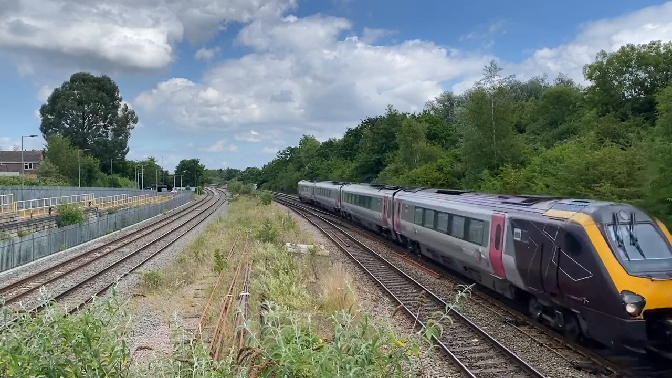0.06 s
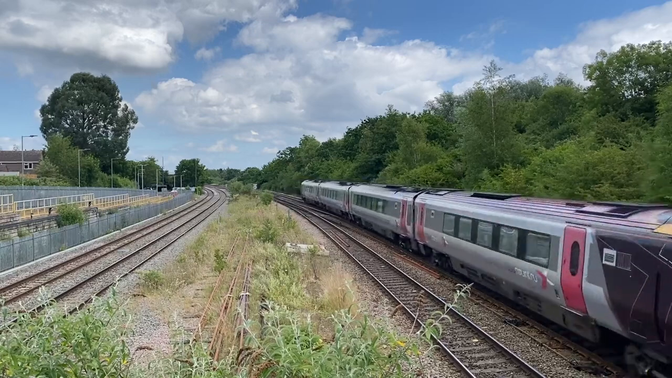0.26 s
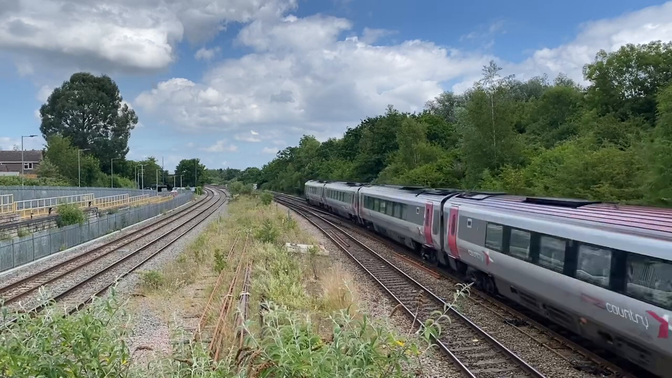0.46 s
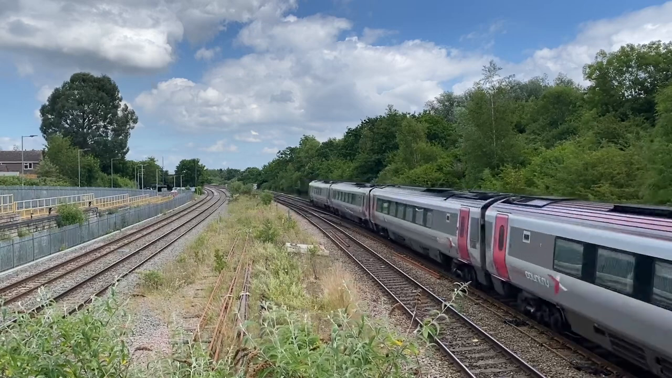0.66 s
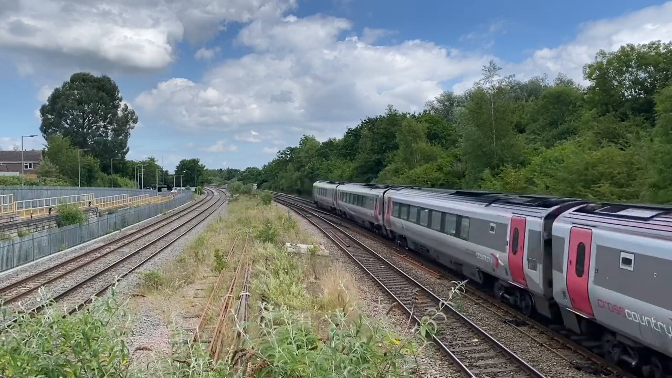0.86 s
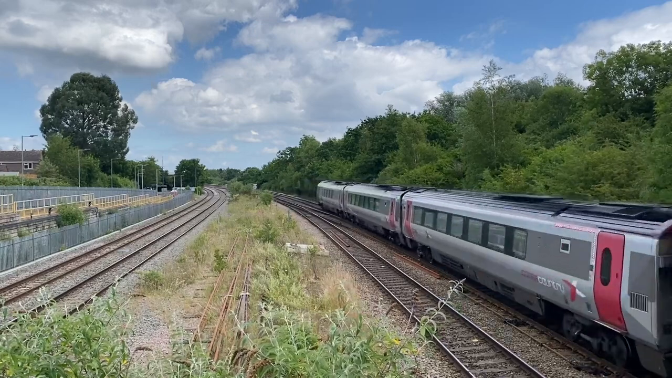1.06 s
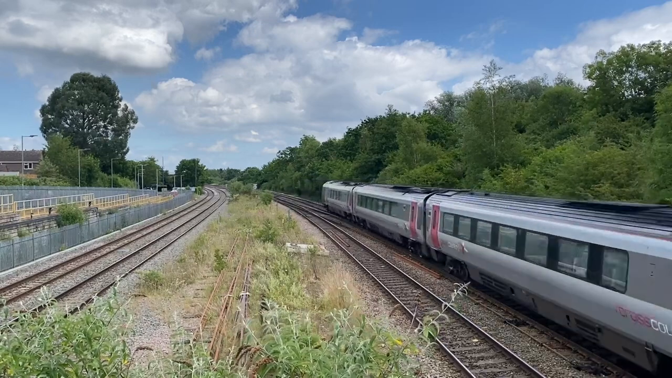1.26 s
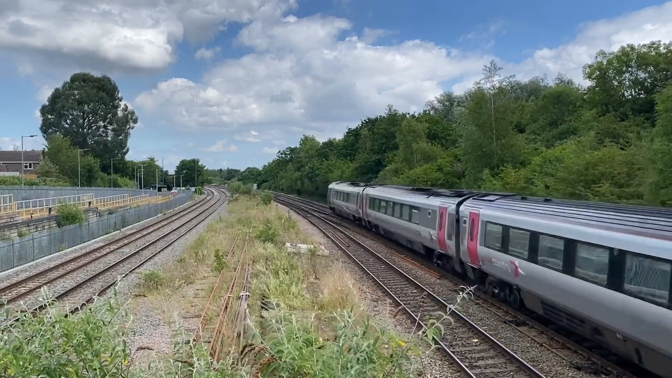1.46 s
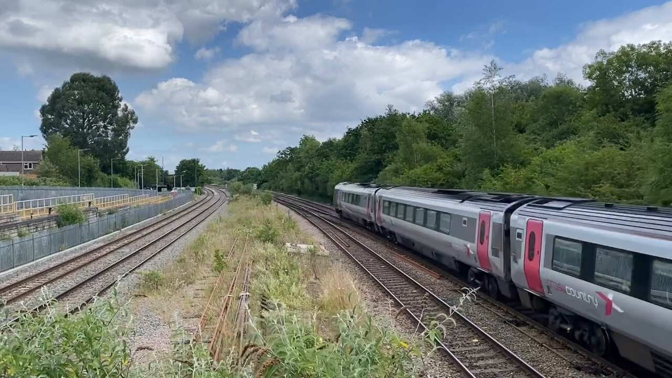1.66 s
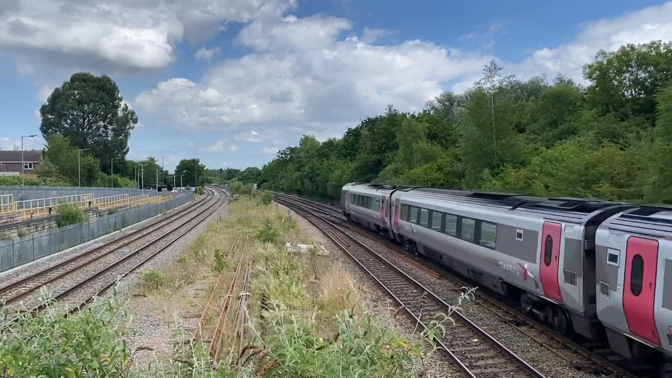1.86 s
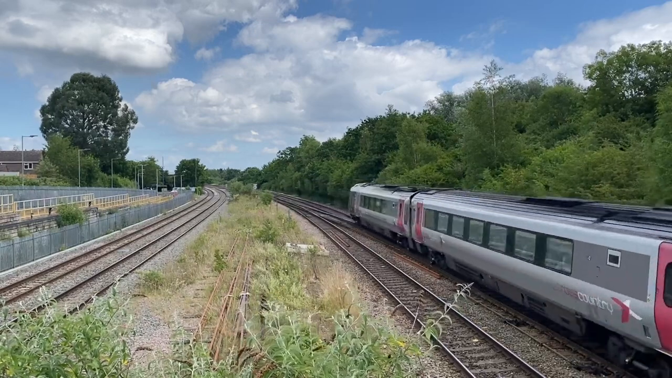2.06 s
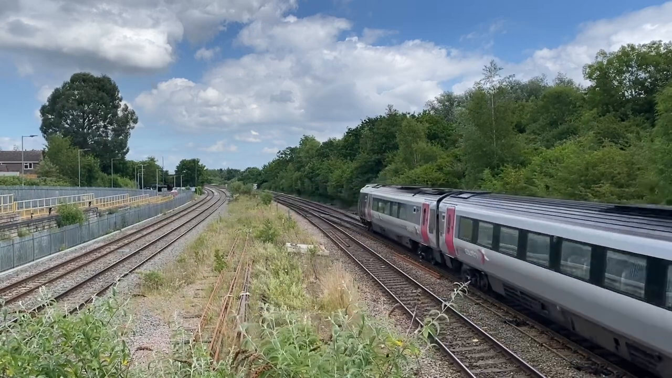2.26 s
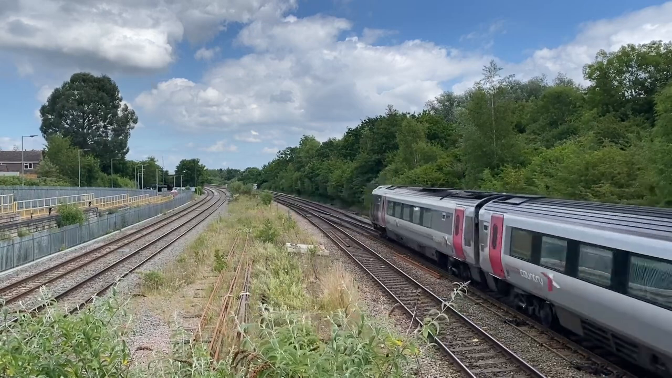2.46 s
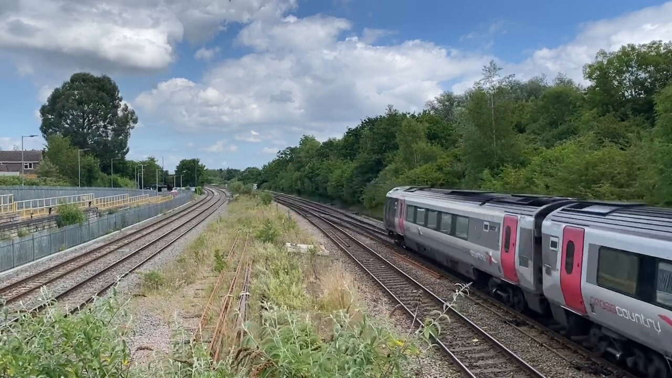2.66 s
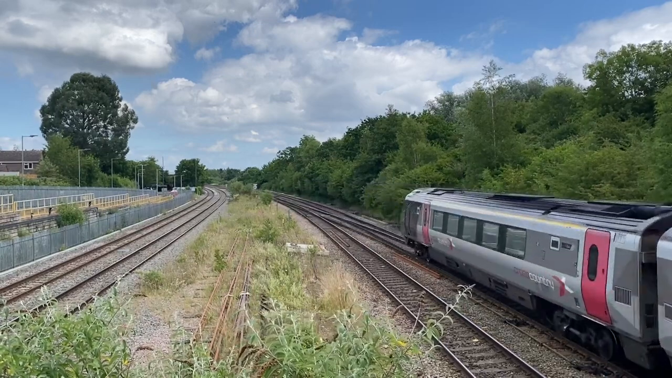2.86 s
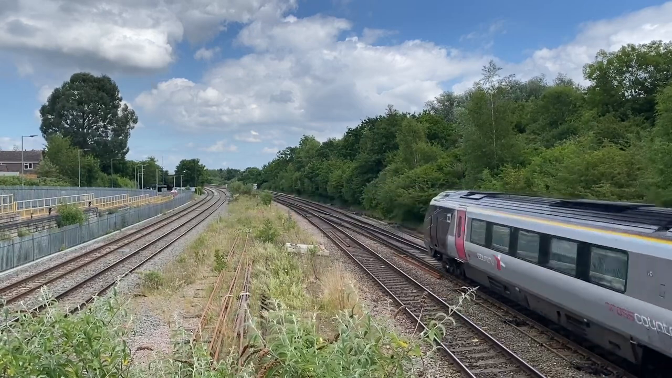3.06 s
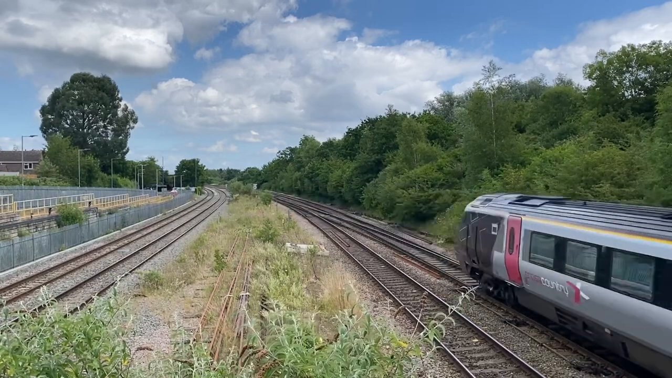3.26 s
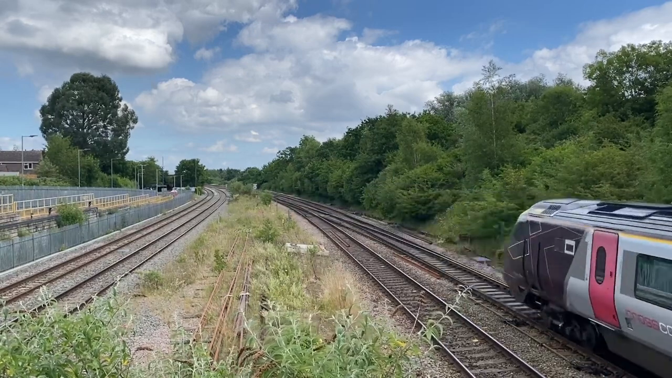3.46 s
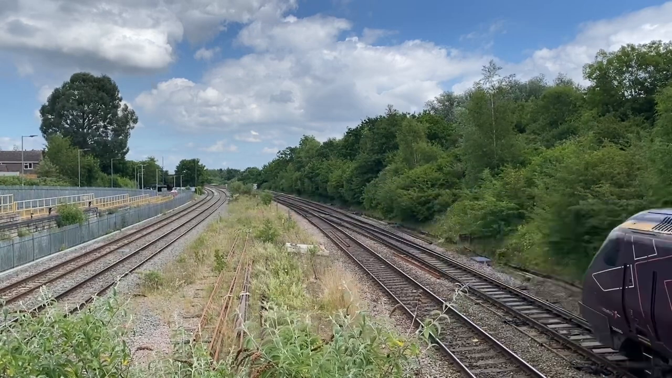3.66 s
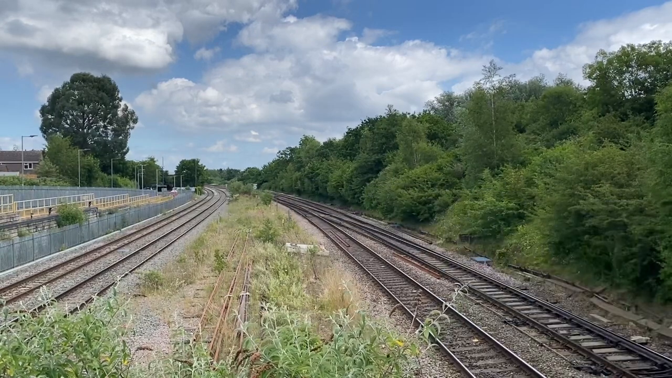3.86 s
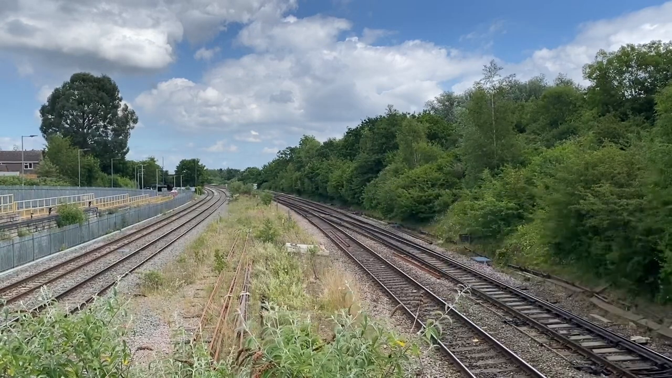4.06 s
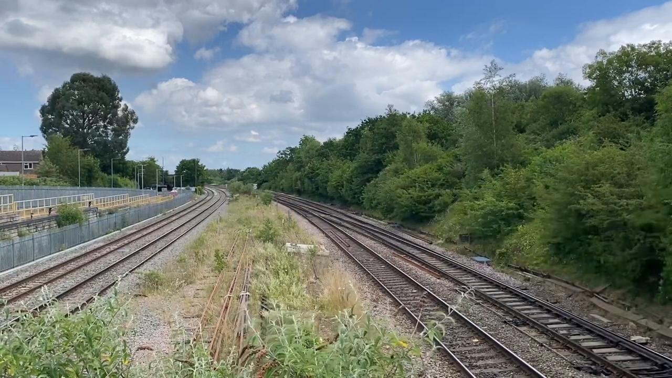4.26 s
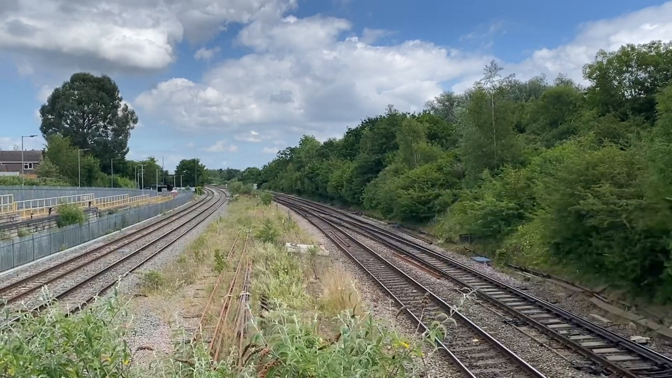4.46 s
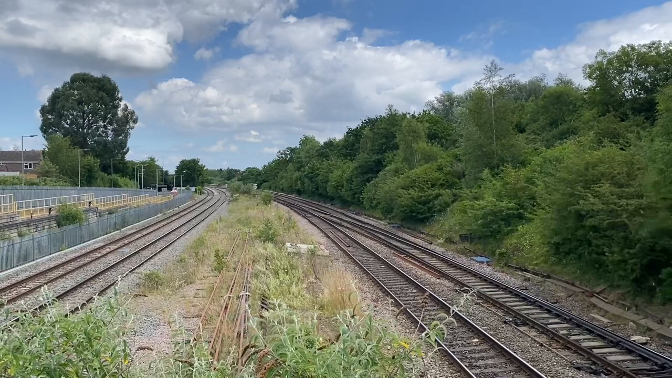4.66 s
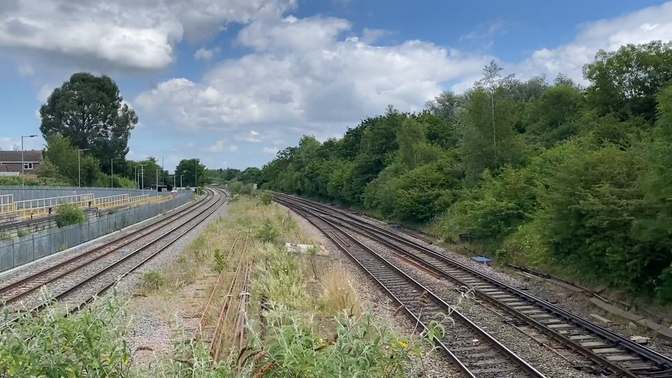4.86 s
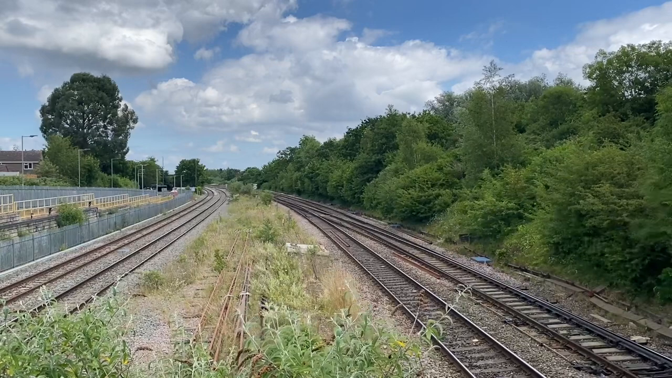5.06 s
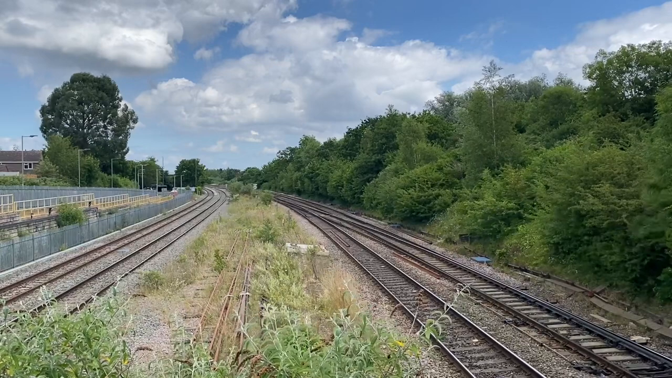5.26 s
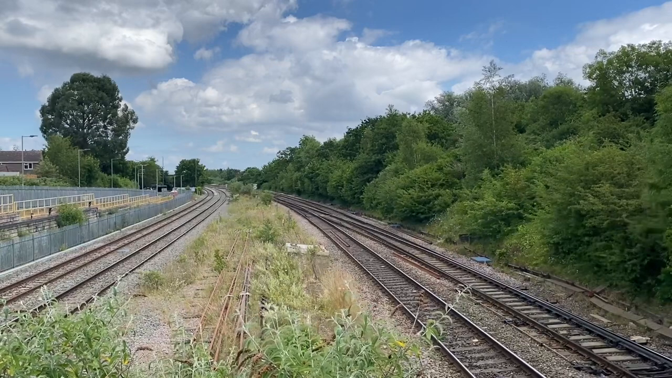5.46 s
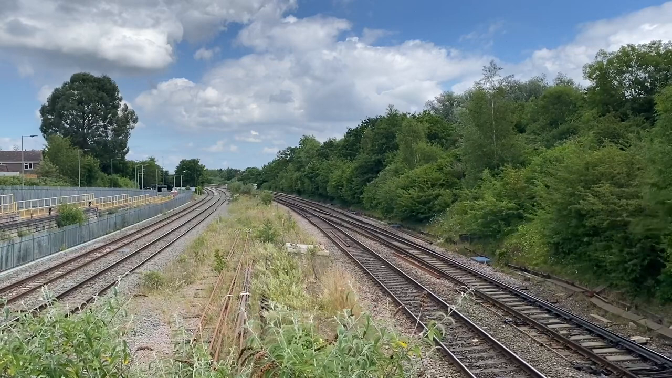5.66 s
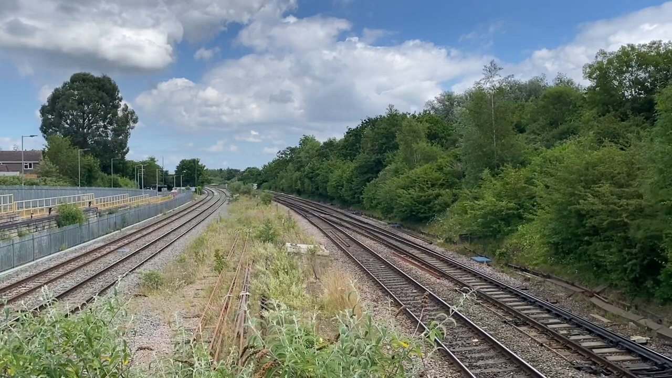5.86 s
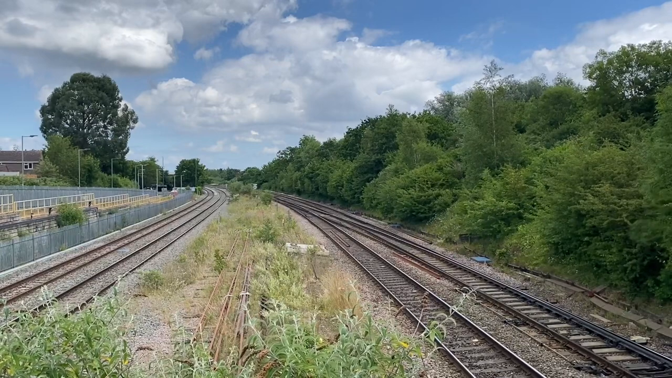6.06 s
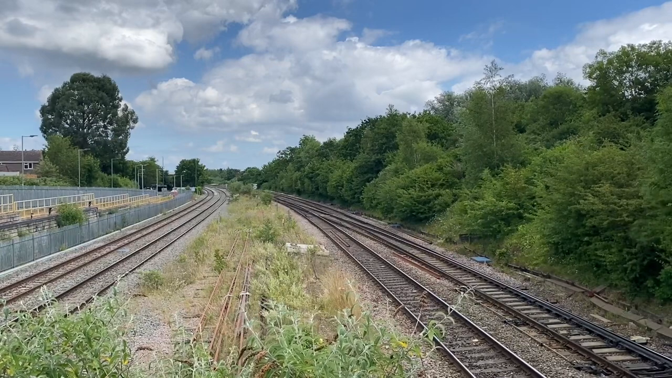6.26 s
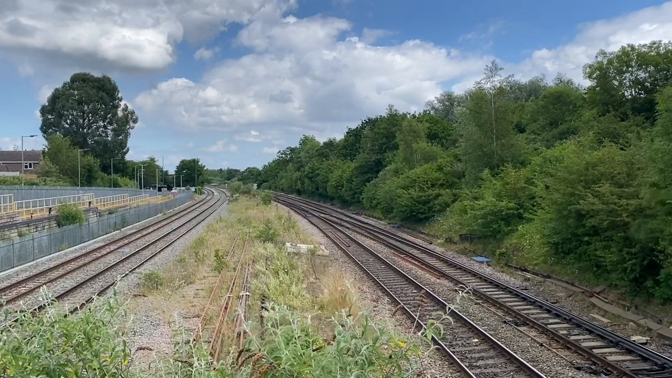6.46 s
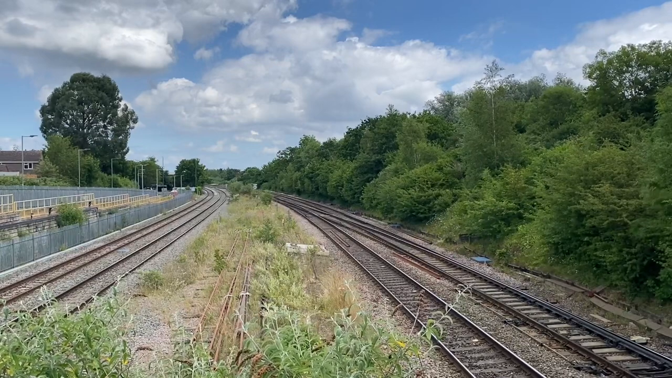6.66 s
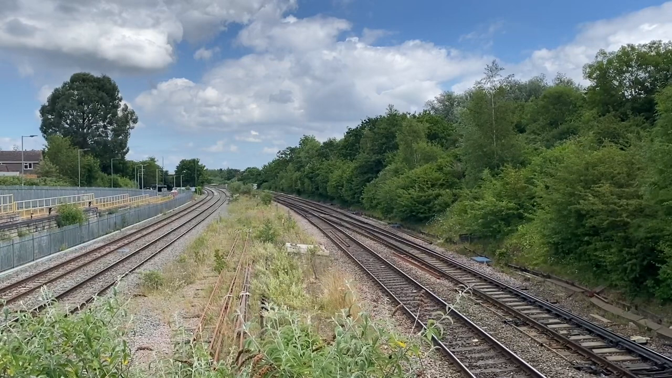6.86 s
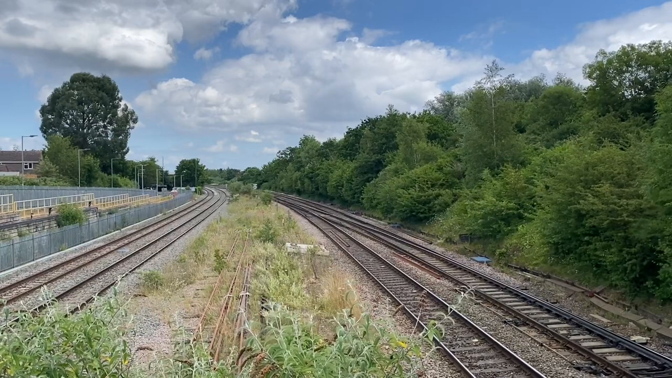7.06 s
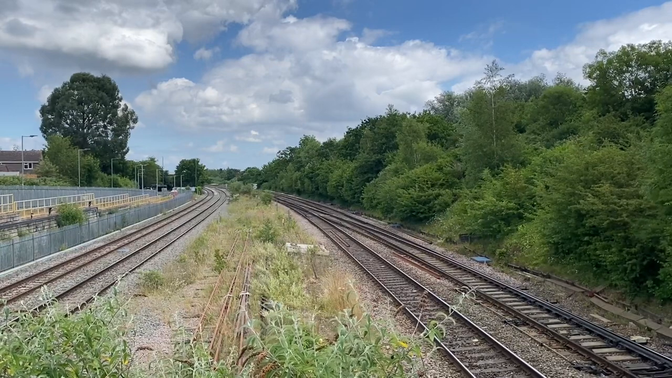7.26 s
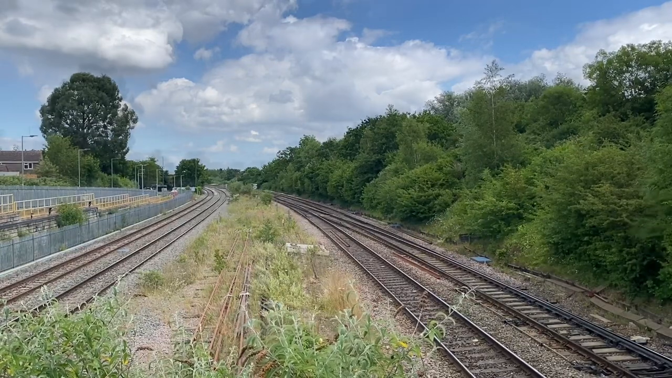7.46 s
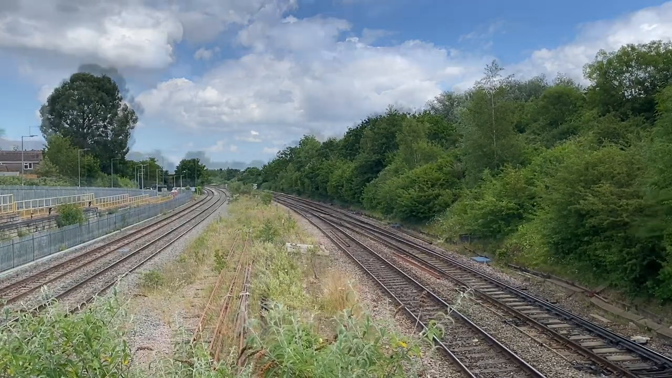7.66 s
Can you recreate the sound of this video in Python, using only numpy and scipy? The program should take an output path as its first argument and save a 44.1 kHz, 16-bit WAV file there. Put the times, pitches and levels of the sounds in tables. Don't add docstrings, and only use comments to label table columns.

```python
import sys
import numpy as np
from scipy import signal
from scipy.fft import rfft, irfft, next_fast_len
from scipy.io import wavfile
from scipy.ndimage import uniform_filter1d

SR = 44100
rng = np.random.default_rng(int(sys.argv[2]) if len(sys.argv) > 2 else 0)


def convert_level_to_amplitude(level_db):
    exponent = np.asarray(level_db, float) / 20
    return 10 ** exponent


def log_audio(samples):
    frames = np.atleast_2d(samples).T
    limited = np.clip(frames, -1, 1)
    pcm = np.round(limited * 32767).astype(np.int16)
    wavfile.write(sys.argv[1], SR, pcm)


N = 340211
T = np.arange(N) / SR
GONE = np.clip((T - 3.8) / (4.9 - 3.8), 0, 1)

# [t/s, level/dB]
WHEEL_ROAR = [(0.0, -30), (0.1, -25), (0.13, -24.5), (0.54, -24), (1.22, -21.5), (1.31, -24), (3.67, -26),
              (3.97, -30), (4.79, -31), (5.09, -34.5), (5.13, -31.5), (5.2, -33), (7.45, -38.5),
              (7.71, -44.5)]


def over_time(table):
    return np.interp(T, *np.transpose(table))


def at(table, hz):
    f, v = np.transpose(table)
    return np.interp(np.log(hz + 1), np.log(f + 1), v)


def band(x, hz, width):
    edges = np.clip([hz - width / 2, hz + width / 2], 5, SR * .49)
    return signal.sosfilt(signal.butter(2, edges, "band", fs=SR, output="sos"), x)


def hiss_band(hz, width):
    x = band(rng.standard_normal((2, N)), hz, width)
    return x / x.std()


def walk(rate):
    k = int(SR / rate)
    held = np.repeat(rng.standard_normal(N // k + 1), k)
    return 1.3 * uniform_filter1d(uniform_filter1d(held, k), k)[:N]


def random_phase():
    return 2 * np.pi * rng.random()


def burst(s, rise, fall):
    t = np.maximum(T - s, 0)
    return (1 - np.exp(-t / rise)) * np.exp(-t / fall)


def swell(s, length, db):
    return db * np.exp(-((T - s) / length) ** 2)


def whistle(s, length, hz, glide, width, db):
    carrier = np.cos(2 * np.pi * (hz + glide * (T - s) / 2) * (T - s))
    return swell(s, length, convert_level_to_amplitude(db)) * carrier * hiss_band(width / 4, width / 2)


def rush(lo, count, colour_db, levels, centres, shared_db, own_db, rate):
    out = 0
    shudder = [walk(rate) for _ in levels]
    for hz in lo * 2 ** (np.arange(count) / 3):
        share = [np.interp(np.log(hz), np.log(centres), row) for row in np.eye(len(centres))]
        db = sum(w * (c + shared_db * s) for w, c, s in zip(share, levels, shudder))
        gain = convert_level_to_amplitude(db + colour_db(hz) + own_db * walk(2 * rate))
        out = out + hiss_band(hz, hz * .23) * np.sqrt(hz / 1000) * gain
    return out


def engines(wobble=0.0021, rough_db=0.5, focus=2.0, growl_focus=1.34):
    # [t/s, firing rate f/Hz, level/dB, second order/dB, third order/dB]
    cars = [
        (.7, 92.7, -11, -8, -18),
        (1.649, 92.12, 5, -3, -6.5),
        (2.63, 91.73, 1, -1, 0.5),
        (3.499, 91.6, 1, 2.5, 3.5),
    ]
    # [multiple of firing rate, level/dB]
    growl_orders = [(2 / 3, -23.5), (4 / 3, -18), (2, -19.5), (5 / 3, -8), (2, -1.5), (7 / 3, -8.5),
                    (2.5, -15.5), (8 / 3, -13), (3, -7.5), (10 / 3, -17.5), (4.5, -25)]
    # [t/s, level/dB]
    loudness = [(0.0, -24), (0.23, -24.5), (0.32, -32.5), (1.16, -19.5), (1.24, -37), (1.31, -22),
                (1.76, -16.5), (1.8, -26), (1.87, -20), (2.86, -17.5), (2.9, -24), (3.35, -15),
                (4.66, -32.5), (4.87, -44), (5.15, -33.5), (6.76, -52), (6.81, -43), (7.71, -46)]
    speed_ms, track_m = 25., 7.975
    tone, growl, power = 0, 0, np.zeros((2, N))
    for s, hz, db, second_db, third_db in cars:
        along = speed_ms * (T - s)
        r = np.hypot(along, track_m)
        heard_hz = hz / (1 + speed_ms / 343 * along / r) * (1 + wobble * walk(6))
        phase = 2 * np.pi * np.cumsum(heard_hz) / SR
        near = convert_level_to_amplitude(db) * np.array([r ** -focus, r ** -growl_focus])
        tone = tone + near[0] * np.sin(phase + random_phase())
        for k, order_db in growl_orders:
            car_db = {2: second_db, 3: third_db}.get(k, 0.1) - 5 * GONE * (k > 2.6)
            gain = convert_level_to_amplitude(order_db + car_db + rough_db * walk(15))
            growl = growl + near[1] * gain * np.sin(k * phase + random_phase())
        power += near ** 2
    tone, growl = np.array([tone, growl]) * np.sqrt(2 / power)
    level_db = over_time(loudness)
    smooth_db = uniform_filter1d(level_db, int(0.63 * SR))
    exhaust_ahead_db = swell(s=.2, length=0.48, db=5.4)
    growl_db = -20.5 + 0.95 * (smooth_db + 20.5) + exhaust_ahead_db - 6 * GONE
    return tone * convert_level_to_amplitude(level_db + 0.5 - 7.2 * GONE ** 2) + growl * convert_level_to_amplitude(growl_db)


def rolling():
    # [f/Hz, level per Hz/dB]
    near_colour = [(15, -42), (25, -25), (71, -2.5), (152, -4.5), (209, -1.5), (300, -9), (404, -6),
                   (543, -10.5), (763, -7), (1270, -11.5), (1780, -18.5), (2910, -27.5), (4000, -36),
                   (5200, -61), (8800, -120)]
    far_colour = [(15, -42), (25, -24), (71, -7), (113, -10.5), (213, -4), (333, -14), (387, -3.5),
                  (521, -8), (644, -5.5), (1070, -5), (1380, -28.5), (1780, -16.5), (2850, -37.5),
                  (4000, -49), (5200, -66), (8800, -120)]
    # [f/Hz, width/Hz, level
    # under the roar/dB]
    narrow_tones = [(409, 5, -9.5), (456, 4, -8), (514, 4, -10), (1066, 12, -12), (1755, 40, -20)]
    roar_db = over_time(WHEEL_ROAR)
    near_mean_db = np.mean(roar_db[:SR])
    far_mean_db = np.mean(roar_db[int(5.7 * SR):int(7.4 * SR)])
    change = roar_db - near_mean_db * (1 - GONE) - far_mean_db * GONE
    ground, rumble, wheels, rail = (k * change for k in (1.75, 1.43, 0.84, 1.2))
    slipstream_db = swell(s=4.2, length=0.27, db=11)
    rail_sings_db = swell(s=4.04, length=0.47, db=6.1)
    levels = [ground + slipstream_db, rumble, wheels, rail + rail_sings_db]

    def colour_db(hz):
        return (at(near_colour, hz) - 16) * (1 - GONE) + (at(far_colour, hz) - 30) * GONE

    roar = rush(27.86, count=22, colour_db=colour_db, levels=levels, centres=(50, 250, 830, 1900),
                shared_db=1.3, own_db=1.4, rate=12)
    tones = sum(convert_level_to_amplitude(db + 2 * walk(4)) * hiss_band(hz, width) for hz, width, db in narrow_tones)
    return roar + tones * convert_level_to_amplitude(uniform_filter1d(roar_db, SR // 2)) * GONE


def air(far_loss_db=9):
    # [t/s, level/dB]
    hiss = [(0.0, -42.5), (0.19, -41), (0.54, -35), (0.86, -32), (2.19, -40), (2.45, -40), (3.63, -41),
            (4.12, -41.5), (4.27, -48), (4.55, -49), (4.83, -53), (5.93, -56), (7.39, -61), (7.71, -66)]
    # [f/Hz, level per Hz/dB]
    hiss_colour = [(2000, -2), (3000, 0), (4000, 3), (6000, 2.5), (8000, 0), (10000, 4.5), (12000, -8),
                   (14500, -7), (16000, -10)]
    # [t/s, length/s, rise/dB]
    puffs = [
        (0.104, 0.32, 6),
        (0.437, 0.14, 7),
        (1.393, .04, 4.5),
        (1.702, 0.029, 0),
        (2.253, 0.056, 2),
        (3.177, .08, 3),
        (3.86, .06, 3),
    ]

    def colour_db(hz):
        return at(hiss_colour, hz) - 12 - far_loss_db * GONE * (hz > 12500)

    brake_gear_db = swell(s=.76, length=.16, db=3.5)
    hiss_db = over_time(hiss) + brake_gear_db
    gear = convert_level_to_amplitude(hiss_db - 15.5 - 14.5 * GONE + sum(swell(*row) for row in puffs))
    leaves = convert_level_to_amplitude(-73.5 + 0.29 * (hiss_db + 55.5))
    top_db = 20 * np.log10(np.hypot(gear, leaves))
    port = hiss_band(14900, 1300) * gear * convert_level_to_amplitude(1 - far_loss_db * GONE + 1.7 * walk(12))
    return port + rush(2210, count=9, colour_db=colour_db, levels=[hiss_db, top_db + 13.0],
                       centres=(5400, 11100), shared_db=1.5 - .9 * GONE, own_db=1.33, rate=12)


def thuds():
    # [t/s, peak over the roar/dB]
    sleeper_blows = [(.031, 16), (.097, 15.5), (.315, 16.5), (.406, 11.5), (.855, 9), (1.045, 13),
                     (1.493, 12), (1.783, 7.5), (2.151, 10), (2.556, 14), (2.734, 8), (3.059, 11),
                     (3.239, 7), (3.773, 12), (4.118, 13), (5.606, 10), (6.169, 8), (6.399, 16),
                     (6.517, 14), (7.299, 1), (7.399, 13)]
    wheel_blows = [(.203, 16), (.717, 13.5), (1.154, 6.5), (1.215, 13), (1.638, 14), (1.875, 14.3),
                   (2.288, 8.6), (2.639, 16.5), (2.837, 8), (3.131, 15.4), (3.457, 18), (3.547, 10),
                   (4.031, 13), (4.202, 13), (4.543, 14.3), (4.759, 14.5), (5.127, 13), (5.942, 10),
                   (6.909, 17)]

    def blows(rows):
        return sum(convert_level_to_amplitude(db - .5) * burst(s, .006, .025) for s, db in rows)

    sleeper = blows(sleeper_blows) * hiss_band(474, 0.72 * 474)
    wheel = blows(wheel_blows) * hiss_band(780, 0.46 * 780)
    return convert_level_to_amplitude(over_time(WHEEL_ROAR)) * (sleeper + wheel)


def joint_clacks():
    # [t/s, first axle peak level/dB, second axle peak level/dB]
    bogies = [(.327, -19, -17), (.943, -32, -25), (1.426, -30, -24), (1.939, -23, -38), (2.183, -24, -25),
              (2.784, -24, -20), (3.073, -21, -21.5), (3.613, -24.5, -23), (3.8, -25.5, -41),
              (4.13, -26, -24), (4.547, -25, -25)]
    axle_gap_s = 0.092
    clack = hiss_band(4370, 4600) + convert_level_to_amplitude(-22) * hiss_band(7000, 13500)
    out = np.zeros((2, N))
    for s, first_db, second_db in bogies:
        first = convert_level_to_amplitude(first_db - 4) * burst(s, 0.0077, 0.024)
        second = convert_level_to_amplitude(second_db - 4.5) * burst(s + axle_gap_s, .01, 0.025)
        out += (first + second) * clack
    return out


def air_leaks():
    # [t/s, length/s, level/dB]
    leaks = [
        (.45, 0.12, -34),
        (1.38, .049, -38),
        (2.061, .071, -37.5),
        (2.35, 0.097, -41),
        (2.93, .066, -42),
        (3.245, 0.097, -45),
        (3.87, 0.11, -47),
    ]
    return sum(whistle(s, length, 10570, 0, 550, db) for s, length, db in leaks)


def flange_squeals():
    # [t/s, length/s, f/Hz, glide/(Hz/s), level/dB]
    squeals = [
        (.779, 0.13, 4770, -6000, -30),
        (2.09, 0.012, 1850, 2, -21),
        (4.177, 0.023, 2760, 9000, -28),
        (4.57, .034, 4820, -2, -36),
    ]
    flanges = sum(whistle(s, length, hz, glide, .27 * hz, db) for s, length, hz, glide, db in squeals)
    return flanges + whistle(s=0.56, length=0.8, hz=1816, glide=0.5, width=120, db=-29)


def far_drone(rough_db=2):
    # [multiple of firing rate, level/dB]
    far_orders = [(1, 0.5), (5 / 3, -2.5), (2, -0.5), (7 / 3, -2.5), (8 / 3, -4), (3, -4.5)]
    firing_hz = 86.0
    phase = 2 * np.pi * firing_hz * np.cumsum(1 + .0015 * walk(3)) / SR
    orders = sum(convert_level_to_amplitude(db + rough_db * walk(2.96)) * np.sin(k * phase + random_phase()) for k, db in far_orders)
    level_db = -42 + 1.4 * (uniform_filter1d(over_time(WHEEL_ROAR), SR // 2) + 35)
    fade_in = np.interp(T, (4.35, 4.9), (0, 1))
    return np.sqrt(2) * orders * convert_level_to_amplitude(level_db) * fade_in


def flat_spot():
    # [t/s, peak level/dB]
    tick_level = [(4.76, -26), (5.0, -39), (5.4, -23.5), (5.6, -26.5), (5.78, -32), (6.1, -31.5),
                  (7.09, -33), (7.185, -28), (7.28, -38)]
    # [t/s, pitch rise/Hz]
    rail_rise = [(6.65, 0), (7.2, 88)]
    turns = np.arange(35)
    first_s, turn_s, quickens_s = 4.3835, .09378, 2e-5
    rail_hz, scatter_db = 1754, 1.2
    rail = hiss_band(1600, 650)
    out = np.zeros((2, N))
    for s in first_s + turn_s * turns - quickens_s * turns ** 2:
        db = np.interp(s, *np.transpose(tick_level)) + scatter_db * rng.standard_normal()
        tick = convert_level_to_amplitude(db + 6.5) * burst(s, .0015, .006)
        angle = 2 * np.pi * (rail_hz + np.interp(s, *np.transpose(rail_rise))) * (T - s)
        out[0] += tick * (np.sin(angle) + 0.27 * np.sin(1.12 * angle))
        out += 0.33 * tick * rail
    return out


def stem_snaps():
    # [t/s, peak level/dB]
    snaps = [
        (5.178, -23),
        (5.1844, -34),
        (6.8922, -40),
        (7.1856, -40),
        (7.52, -41),
    ]
    crack = hiss_band(4600, 6500) + convert_level_to_amplitude(-13) * hiss_band(7000, 13500)
    return sum(convert_level_to_amplitude(db - .7) * burst(s, .0003, .002) for s, db in snaps) * crack


def bird():
    # [t/s, length/s, f/Hz, glide/(Hz/s), width/Hz, level/dB]
    chirp = [
        (7.575, .006, 4200, -60000, 250, -58),
        (7.6, .022, 3720, 3000, 90, -58),
    ]
    return sum(whistle(*row) for row in chirp)


def ports(pair, phase, like):
    # [f/Hz, left minus right/dB]
    balance = [(60, -2), (110, -1.0), (200, -1.5), (380, -2.0), (700, -5.5), (1290, -3), (2380, 0),
               (4400, 1.5), (8120, 0.5), (15000, -0.5)]
    size = next_fast_len(N + SR // 10)
    hz = np.fft.rfftfreq(size, 1 / SR)
    c = np.clip(at(like, hz), 0, 1)
    a, b = rfft(pair, size)
    lag = np.exp(1j * np.interp(hz, *np.transpose(phase)))
    lean = convert_level_to_amplitude(at(balance, hz) / 2)
    same, other = np.sqrt((1 + c) / 2) * a, np.sqrt((1 - c) / 2) * b
    return irfft(np.array([(same + other) * lag * lean, (same - other) / lean]), size)[:, :N]


def ground_dip(x):
    dip_hz, width_hz, depth = 432, 13, .7
    hz = np.fft.rfftfreq(N, 1 / SR)
    return irfft(rfft(x) * (1 - depth * np.exp(-((hz - dip_hz) / width_hz) ** 4)), N)


def scene():
    # [f/Hz, left lead/rad]
    near_phase = [(0, 0), (800, -2.4), (1300, -2.7), (1900, -4.6), (2400, -5.9), (5000, -6.2), (5700, -7.2),
                  (6200, -5.9), (6850, -2 * np.pi), (23650, -10 * np.pi)]
    far_phase = [(0, 0), (700, -2.4), (1350, -3.15), (1900, -5.2), (2250, -6.3), (3300, -9.4),
                 (4300, -12.3), (5800, -14.6), (6600, -12.1), (6850, -4 * np.pi), (23650, -12 * np.pi)]
    # [f/Hz, likeness/0-1]
    near_like = [(60, 1), (400, 0.9), (900, 0.51), (1500, 0.79), (1900, 0), (2500, 0.4), (5800, 0.15),
                 (7000, 0.73), (8300, 0.99)]
    far_like = [(60, 1), (400, 0.93), (1000, 0.81), (1800, 0.54), (2500, 0.08), (5000, 0.5), (7500, 0.5),
                (8600, 1)]
    pair = rolling() + air() + thuds() + joint_clacks() + air_leaks() + flange_squeals()
    pair += flat_spot() + stem_snaps() + bird()
    pair[0] += engines() + far_drone()
    side = ports(pair * (1 - GONE), near_phase, near_like)
    behind = ports(pair * GONE, far_phase, far_like)
    return side + ground_dip(behind)


def band_limit(x):
    return signal.sosfilt(signal.butter(12, 16690, fs=SR, output="sos"), x)


def record(dry):
    rounded = np.tanh(0.78 * dry) / 0.82
    top_cut = signal.ellip(10, .2, 80, 15750, fs=SR, output="sos")
    mix = signal.sosfilt(top_cut, rounded)
    return band_limit(mix)


dry = scene()
out = record(dry)
log_audio(out)
```